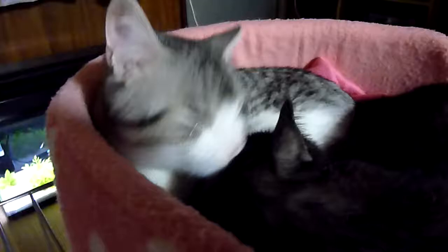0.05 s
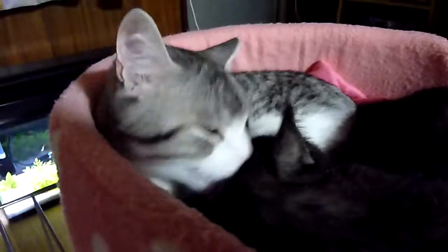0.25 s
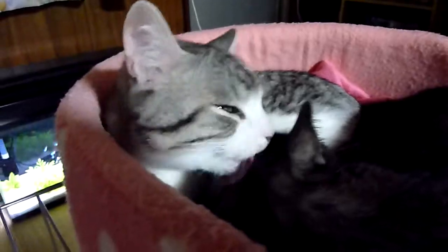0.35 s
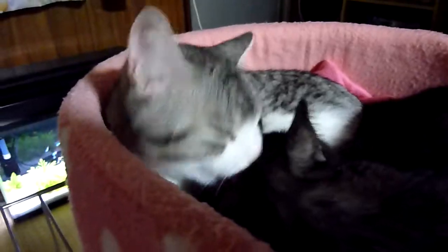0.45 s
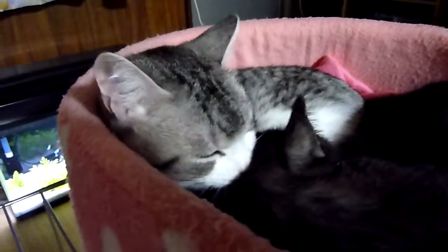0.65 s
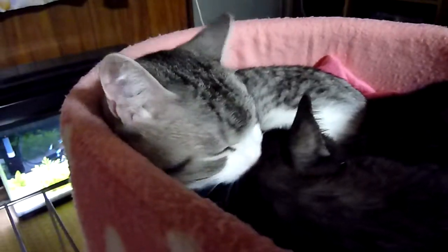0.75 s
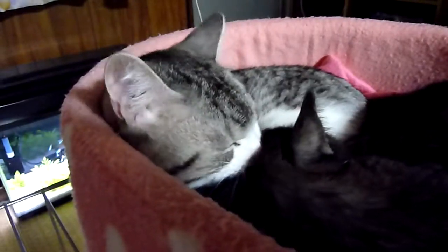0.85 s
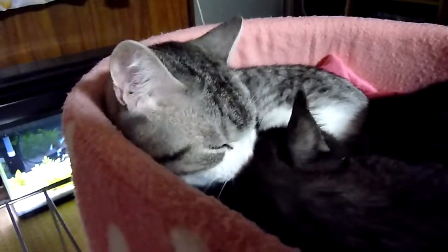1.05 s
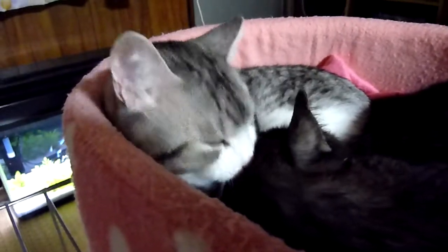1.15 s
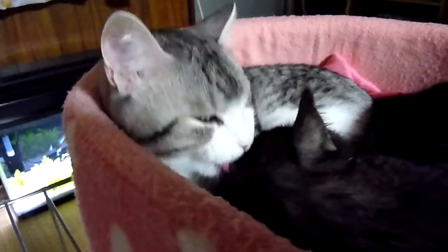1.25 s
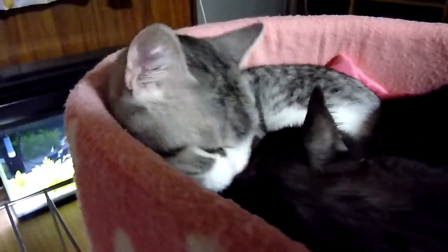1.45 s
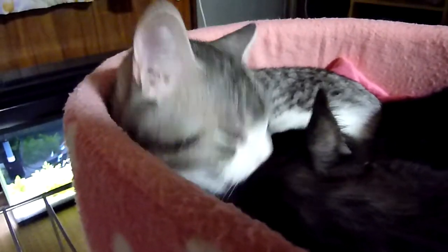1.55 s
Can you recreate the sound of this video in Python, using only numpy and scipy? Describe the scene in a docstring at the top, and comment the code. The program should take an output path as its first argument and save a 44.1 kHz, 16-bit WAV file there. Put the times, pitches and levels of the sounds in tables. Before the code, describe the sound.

A cat licking fur close by, with faint wet ticks and smacks over room hiss.

```python
"""First comes a pop as the microphone switches on, a moment late, in a quiet room.
Close by, a cat licks a second cat in a fleece bed. Its tongue and lips make tiny wet ticks
and duller smacks as small pockets of air ring, and the tongue rasps faintly through fur.
The bed gives two soft bumps. All of it is barely louder than the room's hum and hiss."""
import sys
import numpy as np
from scipy.fft import rfft, irfft, next_fast_len
from scipy.io import wavfile

SR = 44100
rng = np.random.default_rng(int(sys.argv[2]) if len(sys.argv) > 2 else 0)


def master_out(mix):
    """Clip the mix to full scale and print it as 16-bit PCM to the path in sys.argv[1]."""
    frames = np.transpose(np.atleast_2d(mix))
    ceiling = np.clip(frames, -1, 1)
    pcm = np.round(ceiling * 32767).astype(np.int16)
    wavfile.write(sys.argv[1], SR, pcm)


N = 70560
T = np.arange(N) / SR

# Wet ticks of the tongue (time [s], final pitch [Hz], level [dB], time to fade by 60 dB [s],
# overtone level against the main note [dB], starting pitch [times the final pitch])
TONGUE_TICKS = [(0.6597, 3350, -37.5, 0.0048, -20, 1.15), (1.0752, 4800, -43.5, 0.003, 3, 1.3),
                (1.087, 2400, -49, 0.0036, -4, 1.1), (1.1318, 1400, -43, .004, -9, 1.1),
                (1.1596, 635, -45.5, 0.0064, -6, 1.8), (1.4194, 2550, -41, 0.0038, -4, 2.2)]
# Smacks of the mouth (time [s], pitch [Hz], level [dB])
MOUTH_SMACKS = [(.279, 1220, -53), (.452, 1770, -56.5), (.539, 1260, -54.5), (.654, 1390, -49),
                (.809, 1210, -53), (.921, 1370, -49), (1.527, 1330, -50), (1.582, 1700, -55.5)]
# Rasps of the tongue over fur (time [s], length [s], pitch [Hz], width [octaves], level [dB])
FUR_RASPS = [(0.462, .04, 6730, 0.072, -72), (.588, 0.022, 12900, 0.17, -71.5),
             (.664, 0.021, 3470, 0.12, -62), (0.703, 0.056, 1410, 0.077, -68.5),
             (.726, 0.03, 13600, .1, -67), (0.757, 0.076, 7050, 0.31, -71.5),
             (0.847, 0.039, 1470, 0.054, -68), (0.943, .03, 6170, 0.15, -65.5),
             (1.046, 0.023, 4600, .09, -62.5), (1.056, 0.069, 2800, 0.64, -66.5),
             (1.154, .014, 13300, 0.14, -68), (1.234, 0.052, 1440, 0.033, -65.5),
             (1.362, 0.091, 1500, 0.099, -64), (1.388, 0.022, 10800, .07, -68),
             (1.438, 0.036, 9160, 0.11, -64), (1.456, .02, 3000, 0.24, -63), (1.446, 0.056, 6000, .3, -71),
             (1.508, .014, 13500, .1, -72), (1.56, .022, 10600, .06, -70.5)]
# Soft bumps as the cat shifts in the bed (time [s], length [s], pitch [Hz], level [dB])
BED_BUMPS = [(1.15, 0.099, 300, -63), (1.298, 0.043, 150, -59.5)]
# Hums of household machines (pitch [Hz], width [octaves], level [dB])
MACHINE_HUMS = [(59.3, .015, -77.5), (132.6, 0.077, -73), (723, 0.0043, -80), (1440, 0.033, -81.5),
                (3570, 0.001, -94.5)]
# Tone colour of the room's rumble and hiss (frequency [Hz], relative level [dB])
RUMBLE_COLOUR = [(25, -13), (45, -7), (85, -6), (125, -1.5), (200, -4), (300, -6), (420, -7.5), (680, -9.5),
                 (1000, -12), (1350, -11.5), (1900, -22.5), (2600, -49)]
HISS_COLOUR = [(900, -19.5), (1800, 0.5), (2500, 1.5), (3500, 0), (5000, -2.5), (7000, -5), (10000, -6.5),
               (13500, -9), (15500, -14.5)]
# How alike each sounds on the left and right (frequency [Hz], likeness [-1 to 1])
RUMBLE_LIKENESS = [(60, 0.94), (130, 0.93), (290, 0.68), (640, 0.5), (1410, 0.047)]
HISS_LIKENESS = [(1500, -0.13), (3100, -0.34), (7000, -0.12), (15000, 0.081)]


def tongue_ticks():
    """The tongue leaves a wet surface: a tiny air pocket rings and drops in pitch as it opens."""
    rise_s, overtone_ratio = 0.0001, 2.23
    out = np.zeros(N)
    for start_s, hz, db, fade_s, overtone_db, start_ratio in TONGUE_TICKS:
        note = ring(start_s, hz, rise_s, fade_s, start_ratio, glide_s=0.00018)
        overtone = ring(start_s, hz * overtone_ratio, rise_s, fade_s / 2)
        out += gain(db) * (note + gain(overtone_db) * overtone)
    return out


def mouth_smacks():
    """The mouth opens: a lower, longer ring with a wisp of wet noise."""
    rise_s, spit_db = 0.00017, -6
    out = np.zeros((2, N))
    for start_s, hz, db in MOUTH_SMACKS:
        note = ring(start_s, hz, rise_s, fade_s=0.014)
        spit = burst(start_s, rise_s, fade_s=0.05) * noise_band(hz, octaves=0.48, spread=1.0)
        out += gain(db) * (note + gain(spit_db) * spit)
    return out


def fur_rasps():
    """Hairs slip off the tongue's tiny hooks in short, grainy swells."""
    slips_per_s, flicker_db = 922, 4
    out = np.zeros((2, N))
    for start_s, length_s, hz, octaves, db in FUR_RASPS:
        slip_sizes = np.interp(T * slips_per_s, np.arange(N), rng.standard_normal(N))
        grain = normalise(gain(flicker_db * slip_sizes))
        loudness = gain(db) * swell(start_s, length_s, peak_share=0.28)
        out += loudness * grain * noise_band(hz, octaves, spread=0.68)
    return out


def bed_bumps():
    """The fleece gives with a dull bump as the cat lifts its head."""
    out = np.zeros((2, N))
    for start_s, length_s, hz, db in BED_BUMPS:
        loudness = gain(db) * swell(start_s, length_s, peak_share=0.3)
        out += loudness * noise_band(hz, octaves=0.37, spread=0.22)
    return out


def quiet_room():
    """Household machines hum faintly over a steady low rumble and a wide hiss."""
    hums = sum(gain(db) * noise_band(hz, octaves, spread=0.42) for hz, octaves, db in MACHINE_HUMS)
    rumble = gain(-60) * steady_noise(RUMBLE_COLOUR, RUMBLE_LIKENESS)
    hiss = gain(-64) * steady_noise(HISS_COLOUR, HISS_LIKENESS)
    return hums + rumble + hiss


def ring(start_s, hz, rise_s, fade_s, start_ratio=1, glide_s=1):
    """A fading note whose pitch slides from start_ratio times hz to hz."""
    age = np.maximum(T - start_s, 0)
    glide = (start_ratio - 1) * glide_s * (1 - np.exp(-age / glide_s))
    return burst(start_s, rise_s, fade_s) * np.sin(2 * np.pi * hz * (age + glide))


def burst(start_s, rise_s, fade_s):
    """A quick rise, then a fall of 60 dB every fade_s."""
    age = np.maximum(T - start_s, 0)
    return (1 - np.exp(-age / rise_s)) * np.exp(-np.log(1000) * age / fade_s)


def swell(start_s, length_s, peak_share):
    """A rounded rise and fall, highest at peak_share of its length."""
    progress = np.maximum(T - start_s, 0) / (length_s * peak_share)
    return progress * np.exp(1 - progress)


def noise_band(hz, octaves, spread):
    """Stereo noise around one pitch; spread 0 puts it in the centre."""
    hill = lambda f: np.exp(-0.5 * (np.log2((f + 1) / hz) / octaves) ** 2)
    middle, side = filtered(rng.standard_normal((2, N)), hill)
    return normalise(middle + spread * np.array([side, -side]))


def steady_noise(colour, likeness):
    """Stereo noise with a given tone colour and left-right likeness."""
    def response(hz):
        angle = np.arccos(np.clip(look_up(likeness, hz), -1, 1)) / 2
        return gain(look_up(colour, hz)) * [np.cos(angle), np.sin(angle)]
    middle, side = filtered(rng.standard_normal((2, N)), response)
    return normalise(np.array([middle + side, middle - side]))


def filtered(sound, response):
    """Turn each frequency up or down by response(frequency)."""
    size = next_fast_len(N + SR // 2)
    hz = np.fft.rfftfreq(size, 1 / SR)
    return irfft(rfft(sound, size) * response(hz), size)[..., :N]


def look_up(table, hz):
    """Read between a table's rows, with octaves evenly spaced."""
    frequencies, values = np.transpose(table)
    return np.interp(np.log(hz + 1), np.log(frequencies + 1), values)


def gain(db):
    """Turn decibels into a multiplier."""
    return 10 ** (np.asarray(db) / 20)


def normalise(sound):
    """Scale to an average strength (rms) of 1."""
    return sound / np.sqrt(np.mean(sound ** 2) + 1e-20)


def scene():
    """The licking cat in the quiet room."""
    return tongue_ticks() + mouth_smacks() + fur_rasps() + bed_bumps() + quiet_room()


def record(dry):
    """The microphone pops on as its voltage jumps and settles; it misses parts of the treble."""
    on_s, fast_s, slow_s = 0.1738, 0.043, 0.23
    pop_db, lean_left_db = -24.5, 0.77
    gap_hz, gap_width_hz, gap_depth, top_hz = 7950, 183, 0.83, 15750
    age = np.maximum(T - on_s, 0)
    settling = (slow_s * np.exp(-age / fast_s) - fast_s * np.exp(-age / slow_s)) / (slow_s - fast_s)
    pop = -gain(pop_db + lean_left_db * np.array([[1], [-1]])) * settling
    live = (T >= on_s) * (dry + pop)
    narrow_gap = lambda hz: 1 - gap_depth * np.exp(-((hz - gap_hz) / gap_width_hz) ** 2)
    top_cut = lambda hz: 1 / (1 + (hz / top_hz) ** 200)
    return filtered(live, lambda hz: narrow_gap(hz) * top_cut(hz))


dry = scene()
out = record(dry)
master_out(out)
```